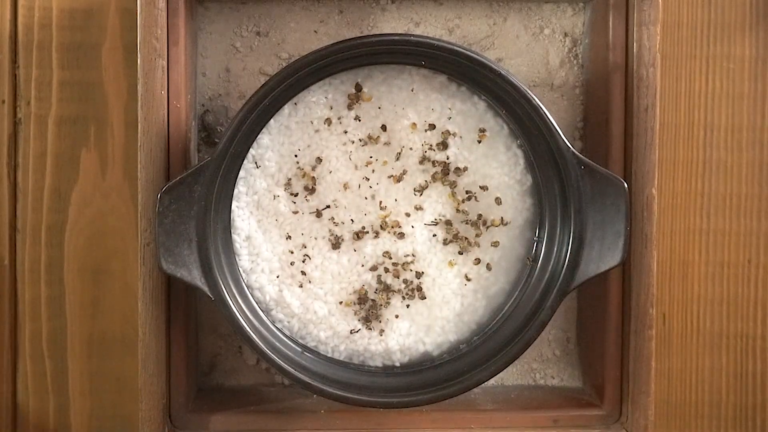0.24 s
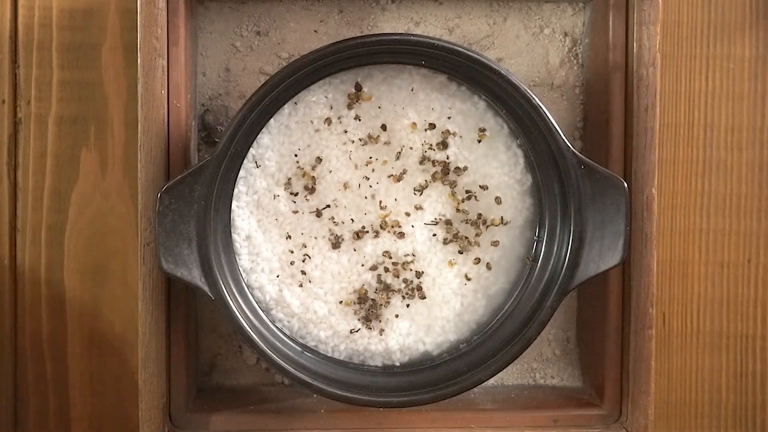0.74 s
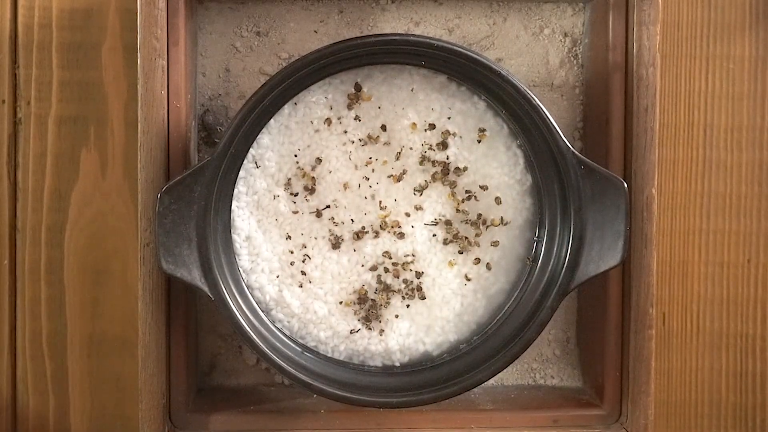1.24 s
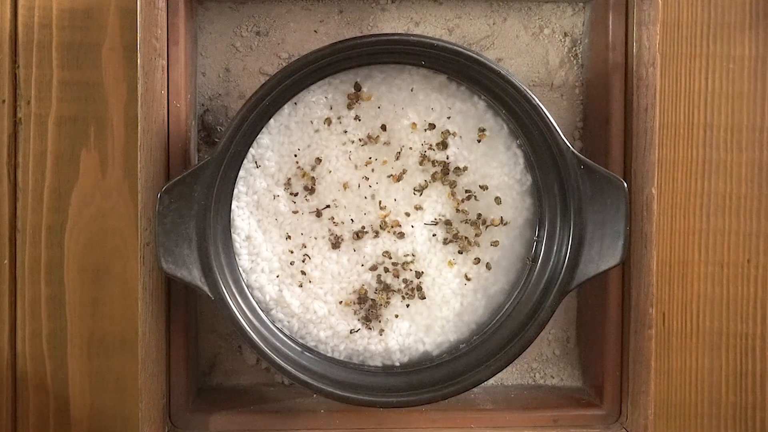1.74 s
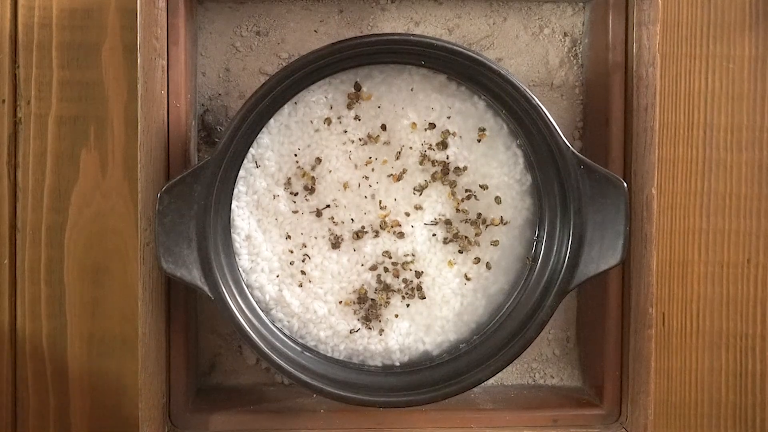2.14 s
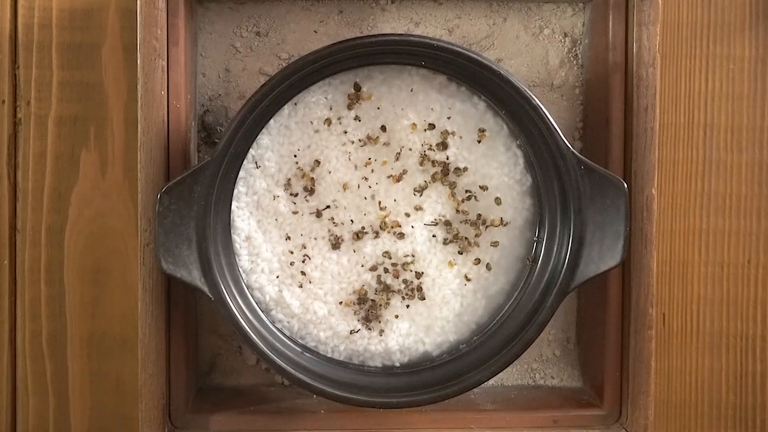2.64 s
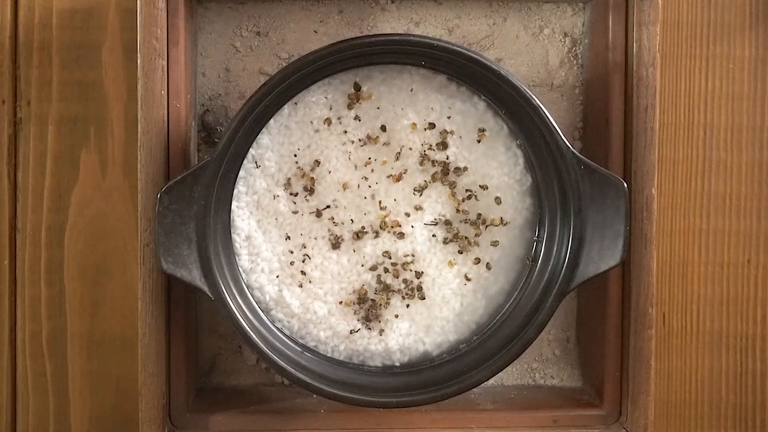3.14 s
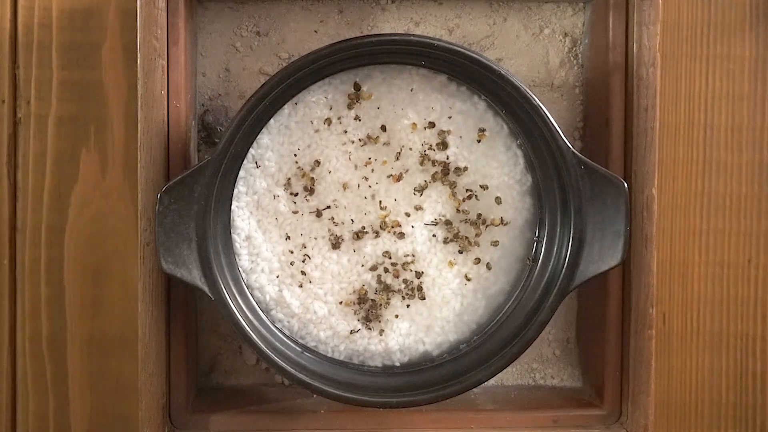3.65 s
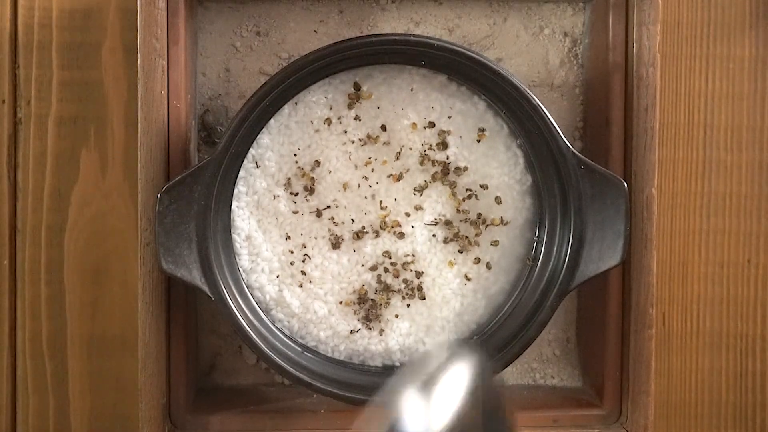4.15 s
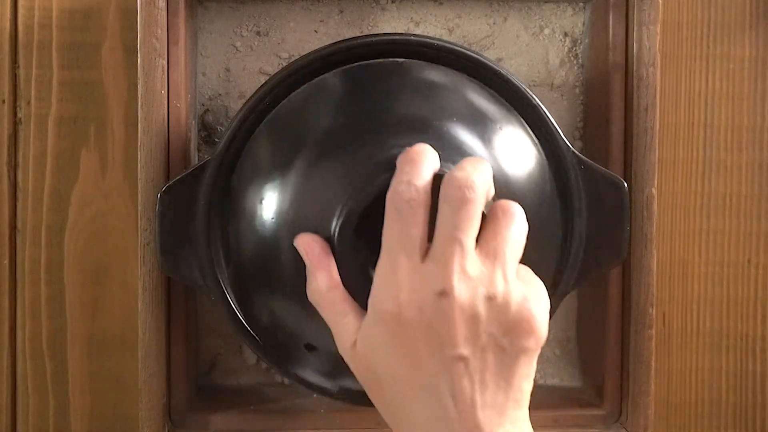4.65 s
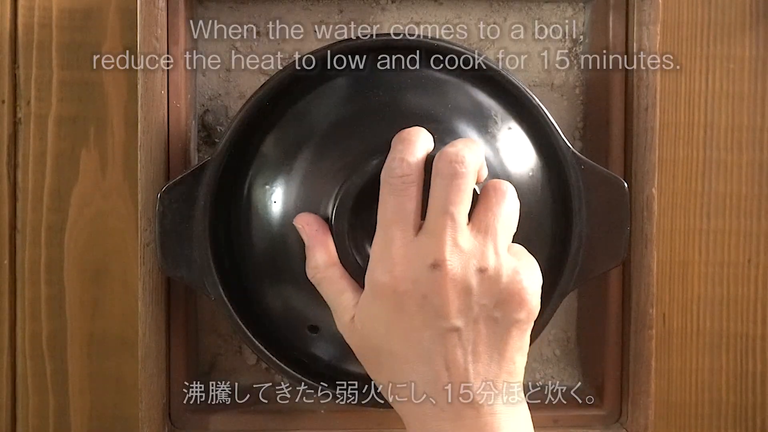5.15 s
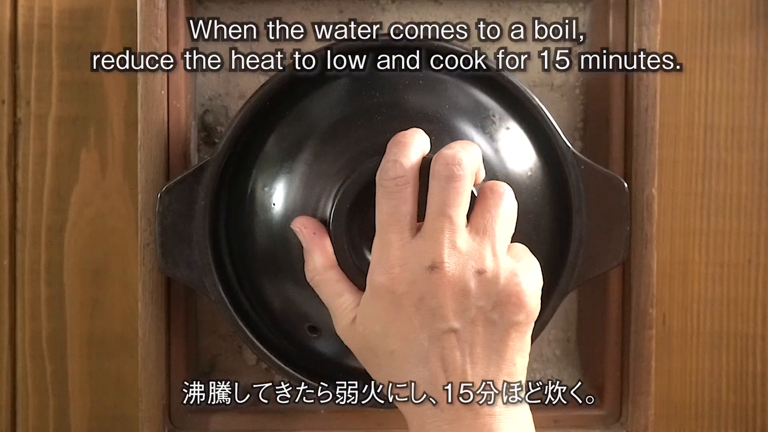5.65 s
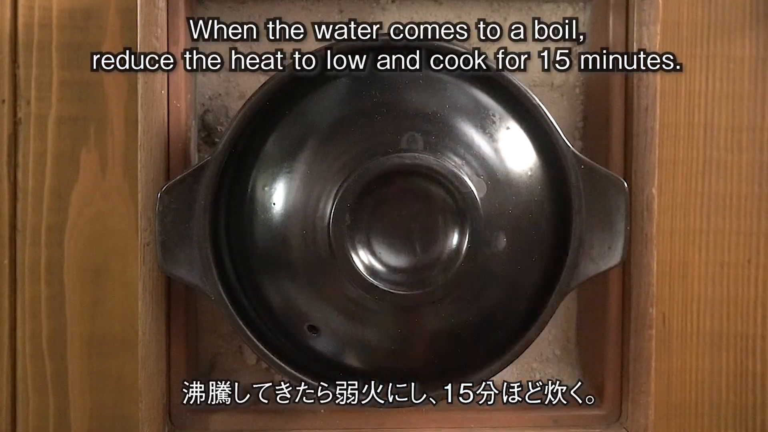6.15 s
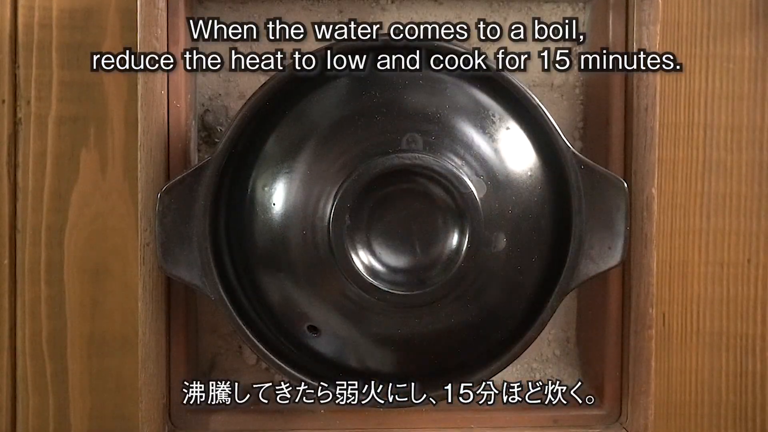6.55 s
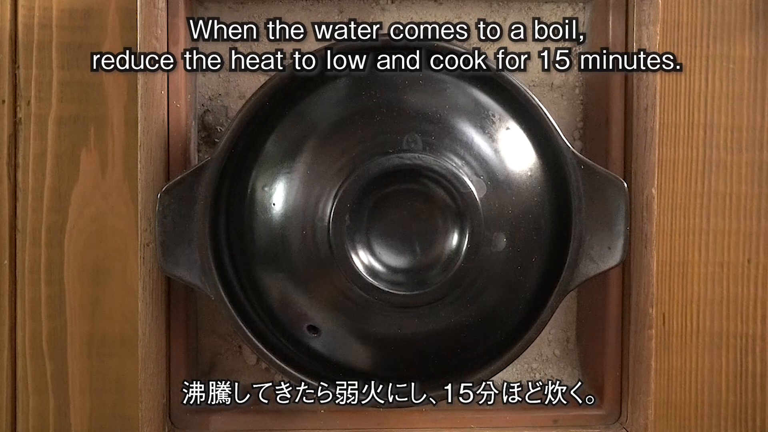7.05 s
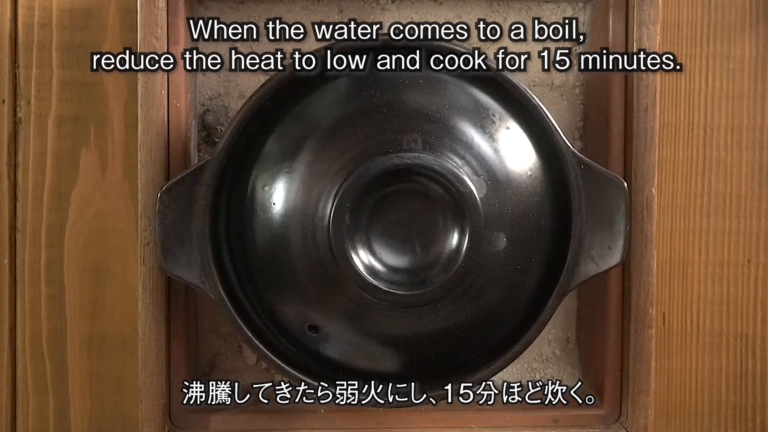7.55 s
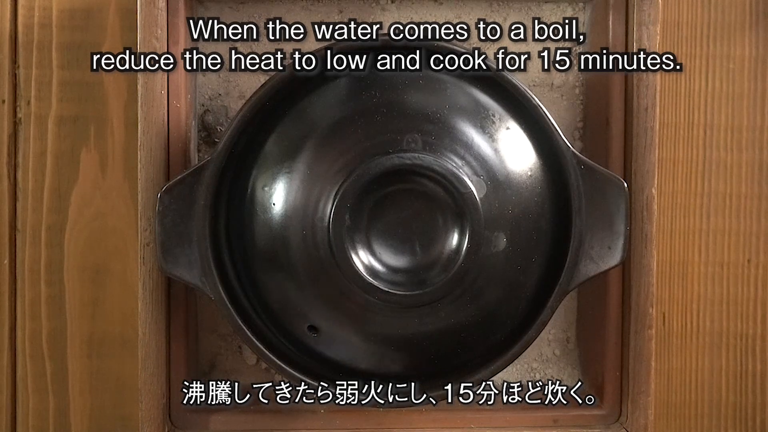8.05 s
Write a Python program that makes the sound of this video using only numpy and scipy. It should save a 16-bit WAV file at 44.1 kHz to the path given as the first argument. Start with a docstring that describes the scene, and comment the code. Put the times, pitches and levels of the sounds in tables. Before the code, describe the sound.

Over a faint indoor hum and airy hiss, several hollow wooden knocks come with the soft rustle of clothing. A little past halfway, a ceramic lid is set on its pot near the microphone: a light scraping touch, a ringing clink, then a gritty clack as it seats. Afterwards there is only light brushing, a soft bump on wood and a couple of tiny ticks.

```python
"""A clay lid set on its pot

Someone moves about a wooden room: sleeves rustle (swelling noise) and boards give dull knocks
(a push and a shudder shake the wood). A glazed clay lid is lifted, carried and set on its pot:
it touches the rim, knocks and seats, and each contact rings the clay's own tones.
Two tiny ticks follow. A faint hum and room air run underneath."""
import sys
import numpy as np
from scipy import signal
from scipy.fft import rfft, irfft, next_fast_len
from scipy.io import wavfile
from scipy.ndimage import uniform_filter1d, map_coordinates

SR = 44100
rng = np.random.default_rng(int(sys.argv[2]) if len(sys.argv) > 2 else 0)


def pcm_store(signal):
    """Save signal as 16-bit PCM."""
    levels = np.round(np.clip(np.atleast_2d(signal), -1, 1) * 32767)
    wavfile.write(sys.argv[1], SR, levels.astype(np.int16).T)


N = 365853

# sleeve swish and air hiss: (time [s], swish level [dB], hiss level [dB])
SWISH_HISS_LEVELS = [(0.0, -55, -60.5), (0.44, -49.5, -68.5), (0.69, -59, -63), (1.59, -57.5, -65.5),
                     (1.78, -52.5, -85), (2.12, -51, -58), (2.89, -56.5, -62.5), (3.81, -53, -58.5),
                     (4.94, -60.5, -65.5), (5.38, -58.5, -64.5), (5.96, -59.5, -65.5), (6.38, -55.5, -62.5),
                     (6.96, -58.5, -63), (7.56, -53, -64), (7.81, -58.5, -65), (8.3, -57.5, -63.5)]
# tone colour of the cloth's broad swish: (frequency [Hz], level [dB])
SWISH_COLOUR = [(210, -47.5), (420, -6.5), (850, -2), (1500, -1), (2200, -1.5), (3400, -4), (4500, -6.5),
                (7200, -13), (11500, -17), (16000, -19.5)]
# tone colour of the room air's high hiss: (frequency [Hz], level [dB])
HISS_COLOUR = [(2500, -27.5), (5000, -5), (8000, -4), (12000, -7.5), (15700, -11)]
# the house's rumble: (time [s], level [dB])
RUMBLE_LEVELS = [(0.0, -57), (0.51, -55), (0.92, -58), (1.22, -59), (2.12, -50.5), (2.84, -55.5),
                 (5.48, -54), (5.66, -48), (5.84, -54.5), (7.09, -54), (7.97, -54), (8.3, -53)]
# tone colour of the rumble: (frequency [Hz], level [dB])
RUMBLE_COLOUR = [(13, -27), (22, -9), (59, -7), (92, -0.5), (124, -7.5), (148, -3.5), (177, -20.5),
                 (210, -14.5), (270, -58.5), (460, -120)]
# tone colour of an appliance's drone: (frequency [Hz], level [dB])
DRONE_COLOUR = [(110, -44), (180, -11), (233, -0.5), (286, -6), (312, -6), (338, -8.5), (393, -5.5),
                (422, -12), (490, -12), (1500, -26), (1950, -76), (3300, -120)]
# its hum: (frequency [Hz], waver width [Hz], level [dB], steady part over wavering part [ratio])
HUM_TONES = [(244, 6.6, -65.5, 0.69), (312.3, 9.4, -58, 2.3), (395.5, 2.2, -73, 0.24), (3407, 38, -74, .1)]
# short brushing noises and one thin, high, squeaky ring:
# (time [s], hold [s], level [dB], centre [Hz], width [Hz])
BRUSHES_AND_SQUEAK = [(0.193, 0.05, -50, 3000, 8000), (1.235, 0.07, -54.5, 5000, 14000),
                      (1.255, 0.04, -55.5, 5170, 300), (1.583, 0.014, -55, 2400, 2000),
                      (1.901, 0.12, -54.5, 5870, 14000), (4.203, 0.16, -47, 860, 2840),
                      (6.962, 0.076, -54.5, 2000, 4950), (7.539, 0.018, -43.5, 1940, 2500),
                      (7.663, 0.054, -55.5, 1960, 4000)]
# knocks on wood; a fade time (t60) is how long a sound takes to drop 60 dB:
# (time [s], level [dB], boost per higher group [dB], shudder fade time [s], place, stroke)
WOOD_KNOCKS = [(0.298, -32.5, -2.5, 0.39, "hollow", "drag"), (.352, -22.5, 0.5, 0.1, "hollow", "tap"),
               (0.3744, -12.5, 0.5, 0.063, "shelf", "tap"), (1.214, -35.5, -0.5, 0.061, "frame", "drag"),
               (1.245, -26.5, 1.5, 0.12, "frame", "tap"), (1.585, -16.5, 1.5, .2, "hollow", "tap"),
               (1.65, -49.5, 4.15, 0.42, "rail", "drag"), (1.979, -29, -0.8, 0.055, "hollow", "tap"),
               (2.115, -15, -3, 0.078, "shelf", "tap"), (2.208, -32, -3, 0.053, "floor", "drag"),
               (2.356, -42.5, -2, 0.065, "hollow", "drag"), (2.395, -46.5, 0.1, 0.07, "frame", "drag"),
               (2.64, -58, -9, 0.067, "frame", "drag"), (3.0, -60, -7, 0.13, "frame", "drag"),
               (4.655, -46, -3.5, 0.14, "floor", "tap"), (4.71, -51, -6.1, 0.07, "floor", "tap"),
               (5.5, -46, -5.3, 0.17, "floor", "drag"), (7.543, -33, 3, 0.071, "floor", "drag")]
# board tones in six groups (thud, hollow, body, clack, rap, edge):
# (frequency [Hz], width [Hz], level [dB])
BOARD_GROUPS = [
    [(70, 3.3, 2.5), (134, 73, -9.5)],
    [(200, 47, -10), (253.2, 33, -4.5), (330.5, 31, 0.5)],
    [(453, 26, 10), (569, 80, 2.5), (788, 110, 0.5)],
    [(863, 105, -1), (939, 91, 0)],
    [(1029, 62, -6.5), (1174, 61, -6.5)],
    [(1468, 133, 19), (1845, 410, 9), (3230, 440, 2.5)],
]
# how each place feeds the groups: (thud [dB], hollow [dB], body [dB], clack [dB], rap [dB], edge [dB])
PLACE_LEVELS = {"floor": (-4.4, -6, -8, -21, -21, -20), "hollow": (-12, -1.6, -11, -24.5, -12, -24.5),
                "shelf": (-24, -6.5, -12, 0.1, -1.5, -12.5), "frame": (-27, -5, 1.3, -5.5, -5, -2),
                "rail": (-18, -22, 1, 0, 6.5, -5)}
# a tap and a drag: (shudder level against the push [dB], rise time over fade time [ratio])
STROKE_SHAPES = {"tap": (-22.5, .06), "drag": (0.1, 0.24)}
# lid contacts: (time [s], strength [dB], grit [dB], share of the free fade time [ratio], spot)
LID_CONTACTS = [(2.657, -61, -31, 0.64, "fingertip"), (2.745, -60, -35, .56, "fingertip"),
                (3.915, -55.5, -31, 0.57, "fingertip"), (5.069, -35.5, -7, 0.67, "edge"),
                (5.162, -20.5, -23, 0.69, "side"), (5.463, -21.5, 0, 0.3, "seated"),
                (5.682, -48.5, -13, 0.17, "knob")]
# tones of lid and pot: (frequency [Hz], fade time [s], then a level [dB] for each spot)
CLAY_TONES = [(312, 0.11, -33, -39, 14.5, -45, -48), (377.6, 0.3, -24, 2.5, 4.5, -45, -36),
              (425.6, 0.35, -2, 7, -4, -45, -39), (485, 0.098, 8, 5.5, -5, -45, -42),
              (566, 0.42, -28, -14, -10.5, -45, -40), (723, 0.055, -28, -8, -3, -45, -40),
              (863, 0.083, -26, -5, -11, -45, -40), (1027, 0.5, -5, -10.5, -6, -35, -40),
              (1057, 0.49, -31, -4.5, -31, -35, -40), (1152, 0.53, -3, -20, -5, -35, -54),
              (1204, 0.69, -23, -22, -10, -45, -41), (1440, 0.14, -33, -2, -10, -45, -40),
              (1540, 0.14, -27, -5, 7, -45, -40), (1816, 0.17, -36, -28, -7, -45, -13),
              (2150, 0.26, -34, -35, -35, -45, 12.5), (2186, 0.27, -44, -31, -3.5, -43, 6),
              (2435, 0.27, -20, -15, -0.5, -12, -24), (2520, 0.14, -24, -20, -2, -24, -30),
              (2678, 0.42, -16, -21.5, -5, -9, -22), (2970, 0.59, -39, -51, -12.5, -32, -24),
              (3730, 0.34, -38, -55, -15, -34, -35), (4137, 0.13, -19, -21, -5, 7, -32),
              (4630, 0.27, -39, -40, -17, -32, -32), (6180, 0.31, -24, -37, -13, -2, -35),
              (6750, 0.073, -26, -36, -13.5, -32, -35), (8410, 0.058, -14, -20.5, -19, 5, -45),
              (9060, .3, -45, -36, -54, -32, -45), (10150, 0.085, -10, -27, -17, -32, -45),
              (10850, 0.07, -10, -34, -26, -32, -45), (12290, 0.06, -13, -21, -34, -32, -45)]
# the spots struck, in the order of those levels: edge, side, seated, fingertip, knob
CLAY_SPOTS = ["edge", "side", "seated", "fingertip", "knob"]
# tiny ticks: (time [s], level [dB], frequency [Hz])
TINY_TICKS = [(6.884, -32, 14200), (8.213, -34, 8500)]
# how long the room echoes: (frequency [Hz], fade time [s])
ROOM_FADE = [(80, 0.14), (300, 0.42), (1000, 0.26), (4000, 0.4), (12000, 0.16)]
# how alike left and right are for noise: (frequency [Hz], likeness [0 to 1])
NOISE_LIKENESS = [(60, 1), (150, 0.94), (380, 0.59), (950, 0.1), (2380, 0.33), (5980, 0.17), (15000, 0.12)]
# the same for echoes: (frequency [Hz], likeness [0 to 1])
ECHO_LIKENESS = [(80, 1), (400, 0.97), (1000, 0.8), (4000, 0.58), (12000, .3)]
# stereo balance: (frequency [Hz], left minus right [dB])
BALANCE = [(60, 0), (500, -0.3), (1200, -2), (2500, -2), (5000, -2.5), (15000, -2)]

DRONE_DB, DRONE_WAVER_DB = -55.5, 1
BRUSH_RISE_S, BRUSH_FADE_S = 0.0076, 0.25
HUM_STOP_S = 8.15
TOP_HZ, LATE_TOP_HZ = 15760, 12500  # treble limit before and after the hum stops


def amp(db):
    """Turns decibels into a factor to multiply by."""
    return 10 ** (np.asarray(db) / 20)


def unit(x):
    """Scales a signal to an average (rms) size of 1."""
    return x / np.sqrt(np.mean(x ** 2) + 1e-20)


def along(points, hz):
    """Reads between (frequency, value) points on a log scale."""
    f, v = np.transpose(points)
    return np.interp(np.log(hz + 1), np.log(f + 1), v)


def curves(rows):
    """Gives one value per sample for each column after the time."""
    times, *columns = np.transpose(rows)
    return [np.interp(np.arange(N) / SR, times, column) for column in columns]


def wobble(rate):
    """A smooth curve through `rate` random points a second."""
    return map_coordinates(rng.standard_normal(int(N * rate / SR) + 4), [np.arange(N) * rate / SR])


def filtered(x, response):
    """Multiplies each frequency in x by response(frequency)."""
    size = next_fast_len(x.shape[-1] + SR // 2)
    return irfft(rfft(x, size) * response(np.fft.rfftfreq(size, 1 / SR)), size)[..., :x.shape[-1]]


def resonances(tones, f):
    """How something that rings at these (frequency, width, level) tones answers frequency f."""
    return sum((-1) ** k * amp(db) * 1j * f * width / (hz * hz - f * f + 1j * f * width)
               for k, (hz, width, db) in enumerate(tones))


def stereo_pair(spectra, hz, likeness):
    """Mixes two unrelated spectra into a partly alike left and right."""
    turn = np.arccos(np.clip(along(likeness, hz), 0, 1))[:, None] / 2
    mid, side = np.cos(turn) * spectra[0], np.sin(turn) * spectra[1]
    return np.array([mid + side, mid - side])


def rush(gain, patchy_db, size=N):
    """Stereo noise coloured by gain(frequency), with random louder and softer patches."""
    hz, _, spectra = signal.stft(rng.standard_normal((2, size)), SR, nperseg=2048, noverlap=1536)
    patches = uniform_filter1d(rng.standard_normal(spectra.shape[1:]), size=24, axis=0)
    patches = unit(uniform_filter1d(patches, size=5, axis=1))
    spectra = stereo_pair(spectra, hz, NOISE_LIKENESS) * amp(patchy_db * patches) * gain(hz)[:, None]
    return unit(signal.istft(spectra, nperseg=2048, noverlap=1536)[1][:, :size])


def add_in_room(out, start, hit, echo_db):
    """Adds a hit to out, with a new scatter of room echoes each time."""
    hz, t, spectra = signal.stft(rng.standard_normal((2, len(hit))), SR, nperseg=256)
    fade = amp(-60 * t / along(ROOM_FADE, hz)[:, None])
    tail = signal.istft(stereo_pair(spectra, hz, ECHO_LIKENESS) * fade, nperseg=256)[1][:, :len(hit)]
    tail[:, :round(.004 * SR)] = 0  # silence until the first wall answers
    echoes = signal.fftconvolve(hit[None], tail / np.linalg.norm(tail[0]), axes=1)[:, :len(hit)]
    heard = hit + amp(echo_db) * echoes
    part = out[:, round(start * SR):][:, :len(hit)]
    part += heard[:, :part.shape[1]]


def sleeves_and_hiss():
    """Sleeves swish with each movement over a mostly steady hiss of room air with some rustle in it."""
    swish_db, hiss_db = curves(SWISH_HISS_LEVELS)
    swish = amp(swish_db) * rush(lambda hz: amp(along(SWISH_COLOUR, hz)), patchy_db=1.5)
    hiss = amp(hiss_db) * rush(lambda hz: amp(along(HISS_COLOUR, hz)), patchy_db=1.0)
    return swish + hiss


def rumble_and_hum():
    """The house rumbles; an appliance drones and hums a few wavering tones."""
    rumble_db, = curves(RUMBLE_LEVELS)
    out = amp(rumble_db) * rush(lambda hz: amp(along(RUMBLE_COLOUR, hz)), patchy_db=-0.5)
    drone_db = DRONE_DB + DRONE_WAVER_DB * wobble(rate=2.538)
    out += amp(drone_db) * rush(lambda hz: amp(along(DRONE_COLOUR, hz)), patchy_db=2.2)
    t = np.arange(N) / SR
    running = np.clip((HUM_STOP_S - t) / 0.023, 0, 1)
    for hz, width_hz, db, steady in HUM_TONES:
        waver = unit(filtered(rng.standard_normal(N), lambda f: resonances([(hz, width_hz, 0)], f) ** 2))
        out += amp(db) * running * unit(waver + steady * np.sqrt(2) * np.sin(2 * np.pi * hz * t))
    return out


def brushes_and_squeak():
    """Noise starts quickly, holds and dies: wide bands brush, the one narrow band rings squeakily."""
    out, t = np.zeros((2, N)), np.arange(SR // 2) / SR
    for start, hold, db, hz, width_hz in BRUSHES_AND_SQUEAK:
        rise = np.clip(t / BRUSH_RISE_S, 0, 1)
        fade = amp(db - 60 * np.clip(t - BRUSH_RISE_S - hold, 0, None) / BRUSH_FADE_S)
        band = rush(lambda f: np.abs(resonances([(hz, width_hz, 0)], f)) ** 2,
                    patchy_db=-2.5, size=len(t))
        out[:, round(start * SR):][:, :len(t)] += rise * fade * band
    return out


def blow(t, shudder_db, rise, t60):
    """The force of a contact: one push, then a dying random shudder."""
    swell = 1 - np.exp(-t / max(rise, .001))
    force = amp(shudder_db - 60 * t / max(t60, .005)) * swell * rng.standard_normal(len(t))
    force[0] = 1  # the push
    return force


def board(tones, t):
    """One group of board tones rings after a push; the wood passes little outside the group."""
    middle = np.sqrt(tones[0][0] * tones[-1][0])
    band = [(middle, 1.19 * middle, 0)]
    push = 1. * (t == 0)
    return filtered(push, lambda f: resonances(tones, f) * resonances(band, f) ** 2)


def knocks():
    """The place struck and the hardness of the blow set how loudly each group of board tones rings."""
    out, t = np.zeros((2, N)), np.arange(SR // 2) / SR
    groups = np.array([board(tones, t) for tones in BOARD_GROUPS])
    steps = np.arange(len(groups)) - (len(groups) - 1) / 2
    for start, db, bright_db, t60, place, stroke in WOOD_KNOCKS:
        shudder_db, rise_share = STROKE_SHAPES[stroke]
        force = blow(t, shudder_db, rise_share * t60, t60)
        rings = signal.fftconvolve(groups, force[None], axes=1)[:, :len(t)]
        peaks = amp(db + np.array(PLACE_LEVELS[place]) + bright_db * steps)
        gains = peaks / np.abs(rings).max(axis=1)
        add_in_room(out, start, gains @ rings, echo_db=-1.5)
    return out


def lid():
    """Each contact rings the clay's tones as the spot struck favours them, with chatter and grit."""
    out, t = np.zeros((2, N)), np.arange(SR // 2) / SR
    hz, free_t60, *spots_db = np.transpose(CLAY_TONES)
    for start, db, grit_db, share, spot in LID_CONTACTS:
        held_t60 = np.maximum(share * free_t60, .005)[:, None]  # hand and rim shorten the ring
        tones = amp(-60 * t / held_t60) * np.sin(2 * np.pi * hz[:, None] * t)
        ring = amp(spots_db[CLAY_SPOTS.index(spot)]) @ tones
        force = blow(t, shudder_db=-32.0, rise=0.0094, t60=0.084)
        onset = 1 - np.exp(-t / 0.00078)
        chatter = onset * signal.fftconvolve(ring, force)[:len(t)]
        grit = amp(grit_db - 60 * t / 0.089) * rng.standard_normal(len(t))
        crack = filtered(grit, lambda f: resonances([(1510, 1400, 0)], f) ** 2)
        # the lid is too small to make deep bass
        touch = filtered(chatter + crack, lambda f: (1j * f / (220 + 1j * f)) ** 3)
        add_in_room(out, start, amp(db) * touch, echo_db=-3)
    return out


def ticks():
    """A high tone that dies almost at once is heard as a bright click."""
    out, t = np.zeros((2, N)), np.arange(SR // 4) / SR
    for start, db, hz in TINY_TICKS:
        click = amp(db - 60 * t / .0025) * np.sin(2 * np.pi * hz * t)
        add_in_room(out, start, click, echo_db=-4)
    return out


def scene():
    """All the sounds together, a little louder on the right and a touch earlier on the left."""
    mix = knocks() + lid() + sleeves_and_hiss() + brushes_and_squeak() + rumble_and_hum() + ticks()
    side, lead_s = np.array([[.5], [-.5]]), 3.5e-5
    return filtered(mix, lambda f: amp(side * along(BALANCE, f)) * np.exp(2j * np.pi * side * f * lead_s))


def record(dry):
    """Cuts off the highest treble; the limit drops lower for the last moment."""
    late = np.clip((np.arange(N) / SR - HUM_STOP_S) / .03, 0, 1)
    duller = filtered(dry, lambda hz: hz < LATE_TOP_HZ)
    return filtered((1 - late) * dry + late * duller, lambda hz: hz < TOP_HZ)


dry = scene()
out = record(dry)
pcm_store(out)
```